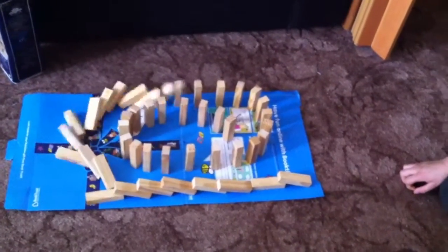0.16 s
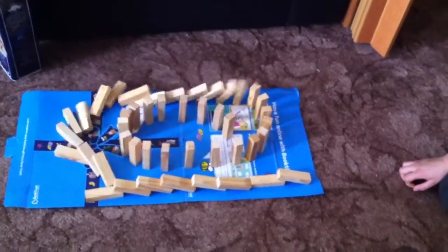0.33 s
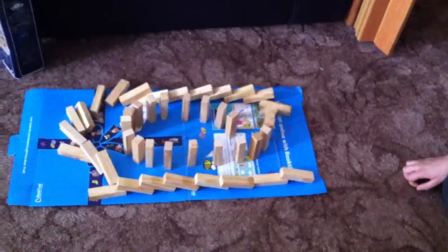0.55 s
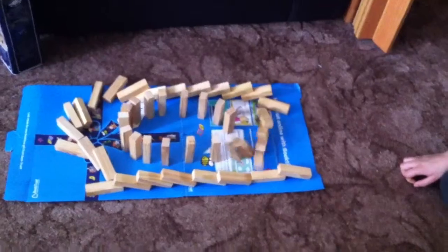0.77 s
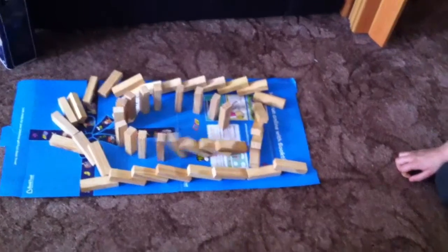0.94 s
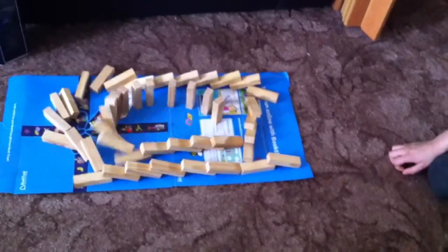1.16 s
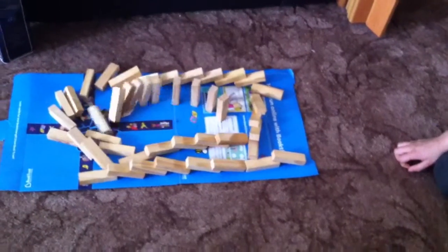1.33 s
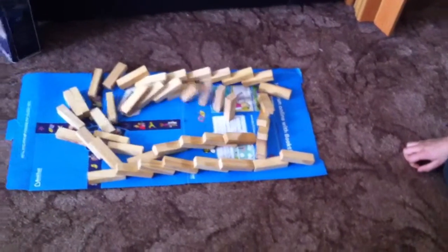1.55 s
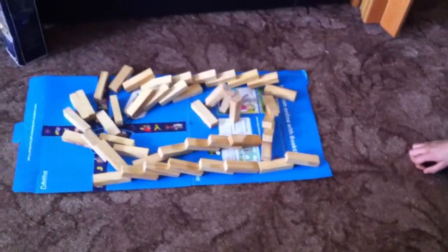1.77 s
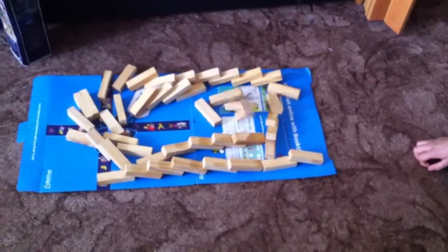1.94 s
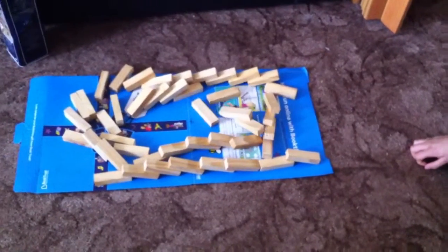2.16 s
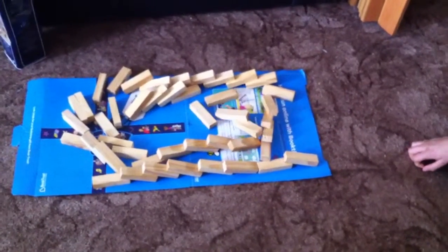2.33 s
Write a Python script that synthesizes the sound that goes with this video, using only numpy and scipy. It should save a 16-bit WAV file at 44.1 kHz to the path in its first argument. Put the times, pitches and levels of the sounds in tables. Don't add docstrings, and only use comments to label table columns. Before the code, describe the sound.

Small wooden blocks knock each other down in quick dry clacks, the last ones scattering

```python
import sys
import numpy as np
from scipy import signal
from scipy.fft import rfft, irfft, next_fast_len
from scipy.io import wavfile
from scipy.ndimage import uniform_filter1d

SR = 44100
rng = np.random.default_rng(int(sys.argv[2]) if len(sys.argv) > 2 else 0)


def put_to_file(sound):
    columns = np.atleast_2d(sound).T
    safe = np.clip(columns, -1, 1)
    whole_steps = np.round(safe * 32767)
    wavfile.write(sys.argv[1], SR, whole_steps.astype(np.int16))


def makeup_ratio(level_db):
    decades = np.asarray(level_db, float) / 20
    return 10 ** decades


N = 105840

# start in
# seconds, clack in dB, thump in dB, snap in dB, loudest wood mode in Hz.
FRONT_KNOCKS = [(0.7474, -41, -50, -58, 2550), (0.8137, -40, -58, -53, 1345),
                (0.8328, -30.5, -47, -59, 2918), (0.8726, -29.5, -38.5, -47, 2810),
                (0.8769, -25, -52, -50, 4500), (0.894, -6, -30.5, -37.5, 2750),
                (1.0573, -22, -39.5, -46, 3800), (1.0705, -30.5, -54, -47, 3350),
                (1.1030, -34, -67, -45.5, 1340), (1.1183, -53, -48, -47, 2000),
                (1.1606, -39, -79, -51, 1550), (1.175, -42, -48, -61, 1290),
                (1.2293, -27.5, -53, -55, 3620), (1.2439, -56, -44.5, -49.5, 3240),
                (1.2679, -30.5, -44, -45, 2280),
                (0.9939, -18.5, -40.5, -43, 2380),
]
# start in seconds, clack in dB, thump in dB, snap in dB,
# loudest wood mode in Hz.
LAST_KNOCKS = [(1.3268, -25, -38, -42, 1500), (1.3333, -19.5, -32.5, -39.5, 1720),
               (1.3642, -11.5, -29, -32.5, 2850), (1.3768, -14, -28.5, -38, 2340),
               (1.4152, -38, -49, -40, 1490), (1.4238, -34, -46, -44, 1520),
               (1.4326, -20.5, -38, -29, 2360), (1.4425, -28, -45, -42, 2300),
               (1.456, -27.5, -40, -53, 1400), (1.5209, -37, -49, -43, 3000),
               (1.5334, -24.5, -28, -40.5, 1500), (1.5865, -45, -63, -47, 2600),
               (1.5971, -17, -48, -46, 1520), (1.5992, -23, -40, -32, 4200), (1.6078, -26, -52, -50, 1580),
               (1.6359, -22.5, -43, -32.5, 1600), (1.6441, -26.5, -36.5, -38, 2300),
               (1.6808, -30.5, -73, -47, 1690), (1.7594, -36, -66, -70, 1360),
               (1.793, -23.5, -30.5, -30, 1380), (2.0632, -60, -36.5, -33.5, 2650),
               (2.068, -33, -37.5, -41, 1310), (2.0738, -40, -45, -40.5, 5400),
               (2.1067, -19, -36.5, -46.5, 1420), (2.1572, -36, -45.5, -57, 1404),
               (2.2759, -36.5, -50.5, -71, 2800)]
# start in
# seconds, clack in dB, thump in dB, snap in dB, loudest wood mode in Hz.
OUTER_RING_KNOCKS = [
    (-0.061, -13, -29.5, -28.5, 1700),
                     (0.0575, -42, -45, -52, 1420), (0.1143, -43, -44, -49.5, 2150),
                (0.1521, -31.5, -62, -51, 3220), (0.1648, -61, -44, -49.5, 2290),
                (0.2222, -40, -51.5, -41.5, 1580), (0.2315, -25, -42, -42, 3206),
                (0.2363, -19.5, -30.5, -37, 1570), (0.2726, -29, -31, -35.5, 1420),
                (0.2773, -18, -34, -42, 1740), (0.2849, -19.5, -28.5, -35, 1420),
                (0.2925, -31, -37, -38, 1640), (0.2959, -23.5, -36, -43, 2000),
                (0.3133, -32, -50, -51, 4240), (0.339, -24, -34.5, -41, 3200),
                (0.4014, -24, -40, -41.5, 3232), (0.441, -22, -36, -41.5, 2420),
                (0.476, -22, -37, -36, 1340), (0.5517, -25.5, -55, -39.5, 1720),
                (0.5598, -48, -44.5, -53, 1530), (0.5786, -28.5, -49, -46, 2270),
                (0.5843, -25.5, -39.5, -39.5, 1420), (0.5995, -27.5, -38.5, -40, 1447),
                (0.637, -19, -54, -33, 1420), (0.638, -16, -29, -31.5, 2730), (0.703, -33, -47, -67, 1335)]
# start in seconds, peak in dB, frequency in Hz,
# T60 in seconds.
END_PINGS = [(0.2222, -41, 9600, 0.01), (0.2318, -37, 10100, 0.011), (0.34, -38, 9700, 0.015),
             (0.442, -39.5, 8000, 0.022), (0.7473, -50, 6730, 0.021), (0.815, -38, 6970, 0.019),
             (1.057, -42, 7820, 0.019), (1.0705, -53, 10100, 0.012), (1.1189, -36.5, 9430, 0.022),
             (1.14, -50, 10400, 0.013), (1.1593, -44, 10100, 0.014), (1.182, -58, 10200, 0.015),
             (1.2286, -46, 8940, 0.029), (1.268, -51, 9200, 0.012), (1.3163, -44, 10100, 0.043),
             (2.1077, -34.5, 6838, 0.024), (2.113, -42, 10100, 0.014)]
# frequency in Hz, peak in dB, T60 in seconds.
HARDEST_MODES = [(494, -28.5, 0.024), (1115, -26.5, 0.0068), (2050, -24.5, 0.0094), (3460, -22, 0.012),
                 (3640, -16, 0.0083), (4600, -22, 0.012), (5000, -22, 0.0083), (7820, -31.5, 0.032),
                 (9360, -20, 0.018)]
# frequency in Hz, peak in dB, T60 in seconds.
CORNER_MODES = [(462, -35.5, 0.033), (3230, -24.5, 0.01), (3980, -21, 0.0078), (4600, -18, .007),
                (5230, -16.5, 0.0074), (6060, -19.5, 0.0065), (6840, -28, 0.0044), (7820, -29, 0.014),
                (9500, -22.5, 0.013), (9920, -29, .014)]
# start in seconds, peak in dB.
FLAT_LANDINGS = [(0.233, -35), (0.278, -49), (0.633, -41), (0.99, -33.5), (1.245, -64), (1.333, -26),
                 (1.43, -27.5), (1.532, -34), (1.634, -51), (1.79, -22.5), (2.037, -34), (2.066, -26)]
# frequency in Hz, level in dB, T60 in seconds.
BLOCK_MODES = [(1420, -17.5, 0.11), (2000, 0, 0.0053), (2550, -7.5, 0.021), (3260, -4.5, 0.02),
               (3605, -18, 0.049), (4390, -0.5, 0.0057)]
# frequency in Hz, level in dB, T60 in seconds.
BOARD_MODES = [(320, -11.5, 0.13), (386.4, -9, 0.12), (465, -6, 0.074), (501, -10.5, 0.035),
               (654, -21, 0.0029)]
# frequency in Hz, level in dB, T60 in seconds.
FLOOR_MODES = [(166.5, -8, 0.24), (223.7, -3, 0.21), (276.4, -10, 0.36), (309.4, -0.5, 0.054),
               (386.7, 7, 0.049), (440, 5, 0.05)]
# frequency in Hz, level in dB.
SNAP_SPECTRUM = [(2500, 9.5), (5500, 3), (8000, 1.5), (12000, -1), (15500, -10)]
# frequency in Hz, level in dB.
GRIT_SPECTRUM = [(500, -5.5), (1200, -29.5), (3000, -3), (6000, -9), (9000, -12), (13000, -41)]
# delay in seconds, level in dB.
WALL_ECHOES = [(0.0094, -7), (0.0132, -8), (0.0183, -9.5), (0.027, -31)]
# frequency in Hz, T60 in seconds.
ROOM_DECAY = [(150, 0.53), (400, 0.23), (1000, 0.23), (2800, 0.23), (7000, 0.22), (14000, 0.26)]
# frequency in Hz, level in dB.
ROOM_SPECTRUM = [(150, -6), (500, -7), (2000, -2.5), (6000, -9), (14000, -7)]
# frequency in Hz, level in dB per Hz.
HISS_SPECTRUM = [(76, -28), (130, -11), (651, 2.5), (829, -5), (1370, -7), (1640, -7.5), (2270, -8),
                 (2720, -11), (16000, -22)]
# frequency in Hz, level in dB.
RUMBLE_SPECTRUM = [(10, 18.5), (25, -58), (60, 10.5), (130, 5.5), (200, -43)]
# frequency in Hz, level in dB.
BAND_LIMIT = [(15500, 0), (15900, -16), (16600, -22), (16800, -90)]
# frequency in Hz, level in dB.
GATE_THRESHOLD = [(1000, -60), (2000, -28), (5000, -19), (15000, -14)]

LEAD, LONG, ONSET = SR // 10, SR // 2, 40
CLACK_DB, THUMP_DB, SNAP_DB, PING_DB, LANDING_DB = -9, 0.5, 3, 2.5, -8.5
MAIN_DB, MAIN_T60 = 3, 0.005
SCATTER_DB, DETUNE, EDGE_SCATTER_DB = 1.5, 0.046, 2
CONTACT_S, CHATTER_S, CHATTER_DB = 0.0001, 0.003, -4
SNAP_T60, GRIT_DB, TICK_DB = 0.015, 13.5, 10
OUTER_DIRECT_DB, FRONT_DIRECT_DB, LAST_DIRECT_DB = -2, -2.4, -1
HARDEST_S, CORNER_S = 0.894, 0.9943
PING_SPLIT, PING_RISE_S, PING_ROOM_DB = 0.009, 0.00023, -3.5
LANDING_RISE_S = 0.011
ROOM_DB, ROOM_START_S, ROOM_RISE_S, BLUR_HZ = 0, 0.007, 0.007, 400
HISS_DB = -52
LOW_CUT_HZ, SKIRT_DB = 169, -25.5
RUMBLE_DB, RUMBLE_S = -30.5, 0.036
FRAME, FRAME_START, GATED_DB = 1024, 370, -40


def along(points, hz):
    f, v = np.transpose(points)
    return np.interp(np.log(hz + 1), np.log(f + 1), v)


def tinted(x, points):
    m = next_fast_len(x.shape[-1] + LEAD)
    gain = makeup_ratio(along(points, np.fft.rfftfreq(m, 1 / SR)))
    return irfft(rfft(x, m) * gain, m)[..., :x.shape[-1]]


def noise(points, size):
    x = tinted(rng.standard_normal(size), points)
    return x / np.std(x)


def ring(modes, t, spread):
    hz, db, t60 = np.transpose(modes)[:, :, None]
    tune, push = rng.standard_normal((2, len(hz), 1))
    decay = makeup_ratio(db + SCATTER_DB * push - 60 * t / t60)
    tuned_hz = hz * (1 + spread * DETUNE * tune)
    return np.sum(decay * np.sin(2 * np.pi * tuned_hz * t), axis=0)


def knock(clack_db, thump_db, snap_db, hz):
    t = np.clip(np.arange(LEAD) - ONSET, 0, None) / SR
    touch = np.zeros(LEAD)
    when, size = rng.random(size=(2, 6))
    touch[ONSET + 10 + (when * CHATTER_S * SR).astype(int)] = makeup_ratio(CHATTER_DB) * (2 * size - 1)
    touch[ONSET] = -1

    main_mode = makeup_ratio(MAIN_DB - 60 * t / MAIN_T60) * np.sin(2 * np.pi * hz * t)
    rung = ring(BLOCK_MODES, t, 1) + main_mode
    wood = -rung * (1 - np.exp(-t / CONTACT_S)) + makeup_ratio(GRIT_DB) * tinted(touch, GRIT_SPECTRUM)

    edge = [(f, db + EDGE_SCATTER_DB * rng.standard_normal()) for f, db in SNAP_SPECTRUM]
    burst = (t > 0) * makeup_ratio(-60 * t / SNAP_T60) * noise(edge, LEAD)
    snap = burst + makeup_ratio(TICK_DB) * tinted(touch, edge)

    thump = ring(BOARD_MODES, t, 0.62)
    return makeup_ratio(clack_db + CLACK_DB) * wood + makeup_ratio(snap_db + SNAP_DB) * snap + makeup_ratio(thump_db + THUMP_DB) * thump


def knocks():
    out = np.zeros(N + 2 * SR)
    groups = [(OUTER_RING_KNOCKS, OUTER_DIRECT_DB),
              (FRONT_KNOCKS, FRONT_DIRECT_DB),
              (LAST_KNOCKS, LAST_DIRECT_DB)]
    for rows, direct_db in groups:
        for s, *blow in rows:
            start = LEAD - ONSET + round(s * SR)
            out[start:][:LONG] += in_room(knock(*blow), direct_db)
    return out[LEAD:LEAD + N]


def pings():
    out, t = np.zeros(N + SR), np.arange(LEAD) / SR
    freed = [(HARDEST_S, db, hz, t60) for hz, db, t60 in HARDEST_MODES]
    freed += [(CORNER_S, db, hz, t60) for hz, db, t60 in CORNER_MODES]
    for s, db, hz, t60 in END_PINGS + freed:
        apart = 1 + PING_SPLIT * rng.uniform(-1, 1, size=(3, 1))
        tone = np.mean(np.sin(2 * np.pi * hz * apart * t), axis=0) * (1 - np.exp(-t / PING_RISE_S))
        ping = makeup_ratio(db + PING_DB + PING_ROOM_DB - 60 * t / t60) * tone
        out[round(s * SR):][:LONG] += in_room(ping, FRONT_DIRECT_DB - PING_ROOM_DB)
    return out[:N]


def landings():
    out, t = np.zeros(N + SR), np.arange(LONG) / SR
    for s, db in FLAT_LANDINGS:
        swell = makeup_ratio(db + LANDING_DB) * (1 - np.exp(-t / LANDING_RISE_S))
        out[round(s * SR):][:LONG] += swell * ring(FLOOR_MODES, t, 0.545)
    return out[:N]


def in_room(x, direct_db):
    hz, t, z = signal.stft(rng.standard_normal(LONG), SR, nperseg=256)
    decay = makeup_ratio(-60 * t / along(ROOM_DECAY, hz)[:, None])
    tail = signal.istft(z * decay, SR, nperseg=256)[1][:LONG]
    age = np.clip(np.arange(LONG) / SR - ROOM_START_S, 0, None)
    tail *= 1 - np.exp(-age / ROOM_RISE_S)

    walls = np.zeros(LONG)
    walls[[round(s * SR) for s, db in WALL_ECHOES]] = makeup_ratio([db for s, db in WALL_ECHOES])

    m = next_fast_len(LONG + LEAD)
    sound = rfft(x, m)
    blurred = np.sqrt(np.abs(uniform_filter1d(np.abs(sound) ** 2, round(BLUR_HZ * m / SR))))
    diffuse = rfft(tail, m) * blurred * makeup_ratio(ROOM_DB) / np.linalg.norm(tail)
    reflected = diffuse + rfft(walls, m) * sound
    answer = tinted(irfft(reflected, m)[:LONG], ROOM_SPECTRUM)
    answer[:len(x)] += makeup_ratio(direct_db) * x
    return answer


def hiss():
    return makeup_ratio(HISS_DB - 8) * noise(HISS_SPECTRUM, N)


def scene():
    return (knocks() + pings() + landings() + hiss())[None]


def gated(x):
    window = np.sqrt(np.hanning(257)[:-1])
    padded = np.pad(x[0], (FRAME - FRAME_START, 2 * FRAME))
    hz, t, z = signal.stft(padded, SR, window=window, nperseg=256)
    power = np.abs(z[:, 1:len(t) // 8 * 8 - 7]) ** 2
    power = np.abs(uniform_filter1d(power, size=7, axis=0)).reshape(len(hz), -1, 8)
    threshold = power.max(axis=2, keepdims=True) * makeup_ratio(2 * along(GATE_THRESHOLD, hz))[:, None, None]
    lost = (power < threshold).reshape(len(hz), -1)
    z[:, 1:1 + lost.shape[1]] *= np.where(lost, makeup_ratio(GATED_DB), 1)
    y = signal.istft(z, SR, window=window, nperseg=256)[1]
    return y[None, FRAME - FRAME_START:][:, :N]


def band_limit(x):
    return signal.sosfilt(signal.butter(12, 16640, fs=SR, output="sos"), x)


def record(dry):
    cut = signal.butter(3, LOW_CUT_HZ, "high", fs=SR, output="sos")
    level = np.sqrt(np.abs(uniform_filter1d(dry ** 2, round(RUMBLE_S * SR))))
    rumble = makeup_ratio(RUMBLE_DB) * level * noise(RUMBLE_SPECTRUM, N)
    x = signal.sosfilt(cut, dry) + makeup_ratio(SKIRT_DB) * dry + rumble
    mix = gated(tinted(x, BAND_LIMIT))
    return band_limit(mix)


dry = scene()
out = record(dry)
put_to_file(out)
```